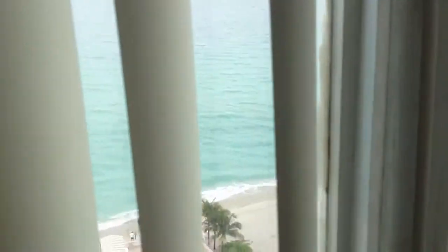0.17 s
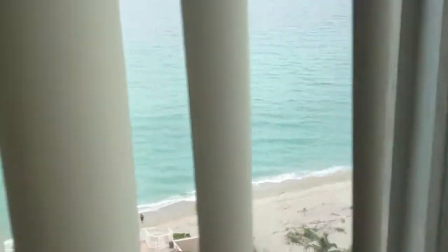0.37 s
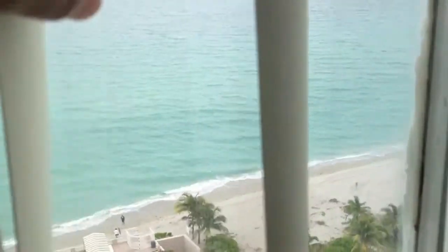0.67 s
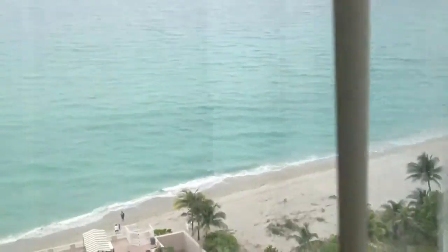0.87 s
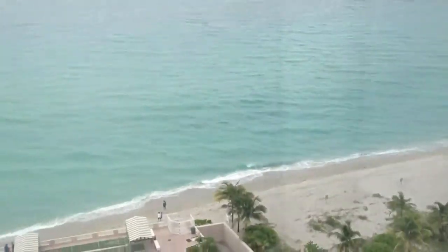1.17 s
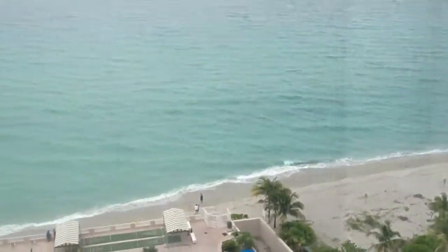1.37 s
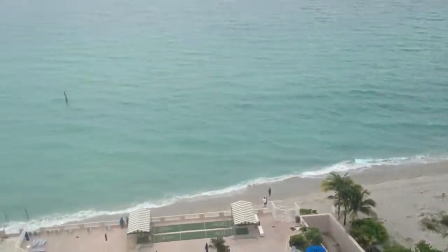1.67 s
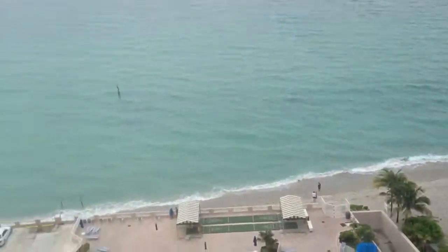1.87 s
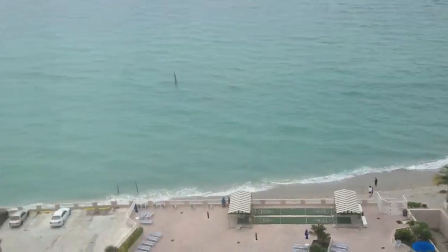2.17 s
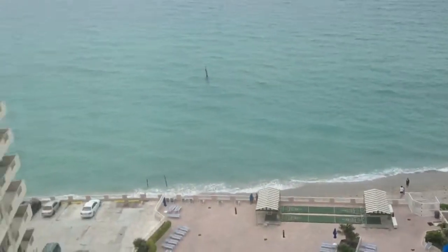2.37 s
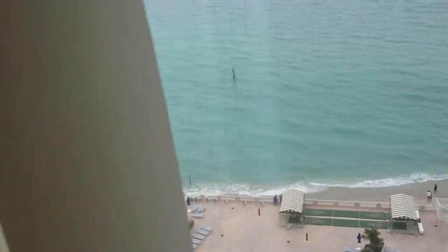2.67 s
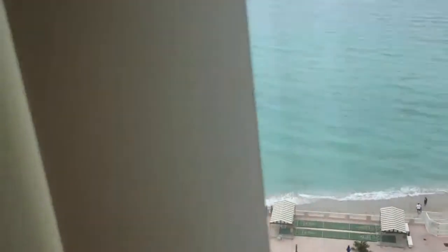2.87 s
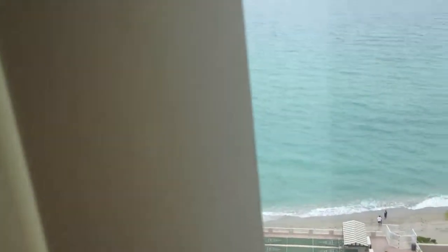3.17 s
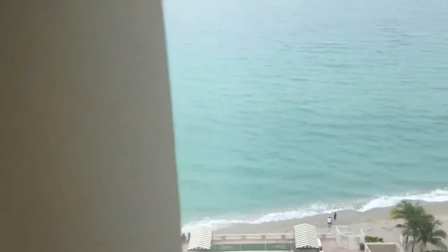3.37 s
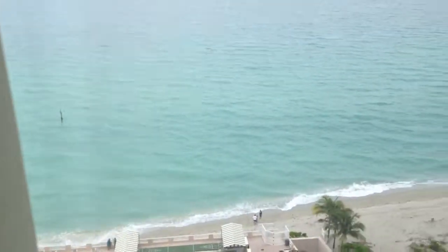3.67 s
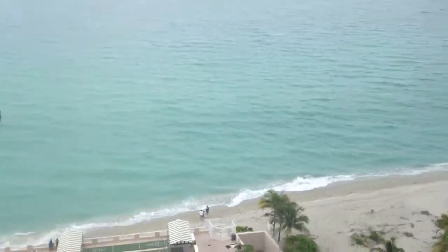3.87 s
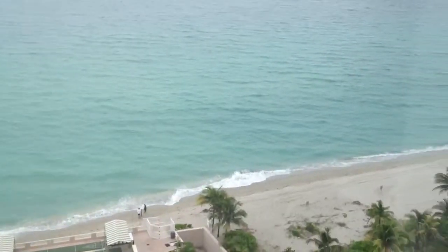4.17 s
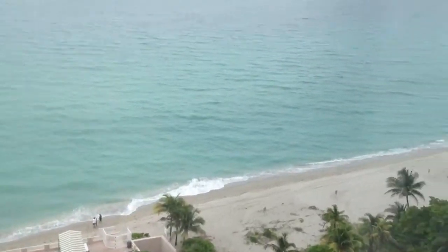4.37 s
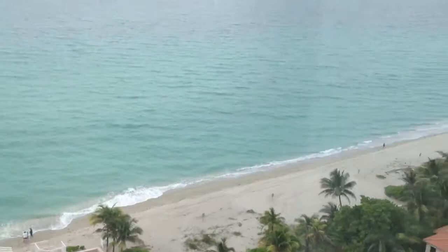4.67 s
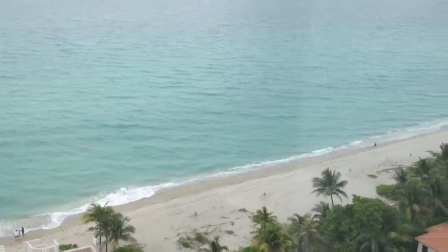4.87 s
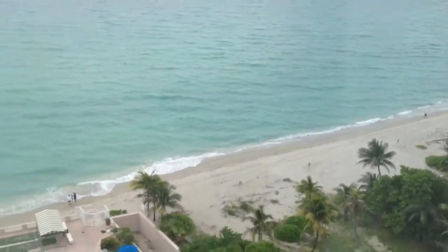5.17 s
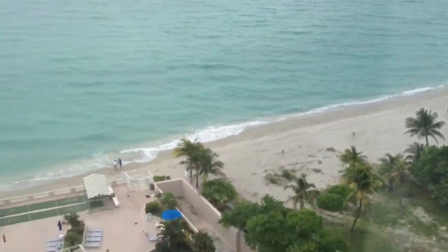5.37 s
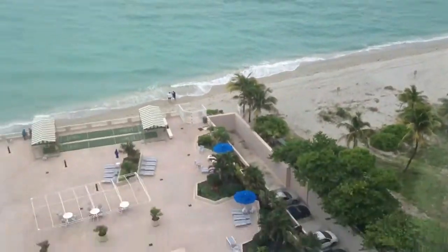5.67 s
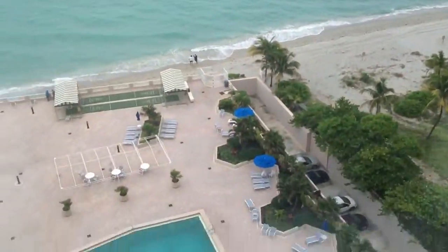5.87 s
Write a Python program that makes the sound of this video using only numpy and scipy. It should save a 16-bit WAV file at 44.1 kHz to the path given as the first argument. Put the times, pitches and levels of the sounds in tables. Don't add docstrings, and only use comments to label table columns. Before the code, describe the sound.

Plastic vertical blind slats tick, scrape and slap as they are pushed aside, with two hollow knocks on the window frame and a low ventilation hum.

```python
import sys
import numpy as np
from scipy import signal
from scipy.fft import rfft, irfft
from scipy.io import wavfile

SR = 44100
rng = np.random.default_rng(int(sys.argv[2]) if len(sys.argv) > 2 else 0)


def makeup_ratio(level_db):
    decades = np.asarray(level_db, float) / 20
    return 10 ** decades


def bounce(signal):
    frames = np.transpose(np.atleast_2d(signal))
    limited = np.clip(frames, -1, 1)
    pcm = np.round(limited * 32767).astype(np.int16)
    wavfile.write(sys.argv[1], SR, pcm)


N = 264644


def rms_one(x):
    return x / np.sqrt(np.mean(x ** 2) + 1e-20)


def at_hz(points, hz):
    points = np.array(points)
    return np.interp(np.log(hz + 1), np.log(points[:, 0]), points[:, 1])


def colour(x, gain_at):
    hz = np.fft.rfftfreq(len(x), 1 / SR)
    return irfft(rfft(x) * gain_at(hz), len(x))


def strip(x, low_hz, high_hz):
    return colour(x, lambda hz: 1 / (1 + (hz / high_hz) ** 12) - 1 / (1 + (hz / low_hz) ** 12))


def drift(rate):
    steps = rng.standard_normal(int(N / SR * 200) + 2)
    return np.interp(np.arange(N) / SR * min(rate, 199), np.arange(len(steps)), steps)


def add(out, x, s):
    at = round(s * SR)
    out[at:at + len(x)] += x[:N - at]


def slat_gain(hz):
    # (frequency [Hz], width [Hz], level [dB])
    resonances = [(685, 34, 1), (1820, 350, 2.5), (2700, 73, -1), (3200, 58, -23), (7200, 1940, 2.5)]
    peaks = sum(makeup_ratio(2 * db) / (1 + (2 * (hz - f) / w) ** 2) for f, w, db in resonances)
    return np.sqrt(1 + peaks)


def air():
    # (frequency [Hz], spectral density [dB per Hz])
    flow_spectrum = [(24, -43), (40, -27), (80, -24), (105, -10.5), (135, -3), (200, -5.5), (270, -8),
                     (400, -14.5), (700, -16), (1300, -18.5), (1700, -25.5), (3400, -30.5), (7500, -34),
                     (9800, -43), (14500, -35.5)]
    hum_hz, hum_db = 121.2, -63
    rumble = rms_one(colour(rng.standard_normal(N), lambda hz: makeup_ratio(at_hz(flow_spectrum, hz))))
    phase = 2 * np.pi * hum_hz * np.arange(N) / SR + 1.9 * drift(9.7)
    hum = np.sin(phase) * makeup_ratio(hum_db + 3.0 + 0.38 * drift(5.6))
    return makeup_ratio(-57 + 0.18 * drift(1.92)) * rumble + hum


def singing(rub, strength_db, swing_db):
    out = rub.copy()
    for hz in np.linspace(24, 94, 44) ** 2 * makeup_ratio(.15 * rng.standard_normal(44)):
        r = np.exp(-np.pi * (45 + .02 * hz) / SR)
        poles = [1, -2 * r * np.cos(2 * np.pi * hz / SR), r * r]
        mode = signal.lfilter([(1 - r * r) / 2, 0, (r * r - 1) / 2], poles, rub)
        out += mode * makeup_ratio(strength_db + swing_db * np.minimum(drift(18), 1.3))
    return out


def pressure(part_db, share, free_db):
    # (time [s], hiss level [dB], flatness of contact [dB])
    sway = [(0, -76, 8.5), (.75, -70, 5.5), (.97, -64.5, 2.5), (1.24, -57.5, -3), (1.3, -57.5, 5),
            (1.41, -53, -10), (1.629, -59, -11), (2.1, -67, 8), (2.3, -61.5, -4), (2.52, -68.5, 0),
            (2.9, -65, -10), (3.25, -62.5, 1.5), (3.72, -63, 12.5), (3.93, -57, 9), (4.1, -61.5, 3.5),
            (4.55, -74, 9.5), (5.7, -81, 10), (6, -67.5, 10.5)]
    # (start [s], length [s], hiss at start [dB], hiss at end [dB], flatness of contact [dB])
    parting = [(0.371, 0.071, -61, -79, 5.5), (.562, 0.04, -64, -60, -3), (0.876, 0.039, -55, -54, -3),
               (1.038, 0.15, -59, -51.5, -30), (1.429, 0.026, -67, -66, 11), (1.525, 0.074, -50, -57, -6.5),
               (1.738, 0.31, -58, -78, -2), (2.035, 0.039, -62, -61, -2), (2.122, 0.061, -61.5, -47, -19),
               (2.186, 0.1, -49, -43.5, -13.5), (2.326, 0.064, -70, -57, -10),
               (2.4285, 0.051, -51.5, -55.5, -7)]
    # (start [s], length [s], hiss at start [dB], hiss at end [dB], flatness of contact [dB])
    swinging = [(2.564, .008, -57, -57, -15), (2.596, .04, -56, -62, -15), (2.648, .004, -48, -52, -15),
                (2.917, 0.13, -63, -48, -10), (3.012, 0.035, -49, -45, -8.5),
                (3.063, 0.027, -39.5, -43, -14), (3.258, 0.018, -44.5, -41.5, -8.5),
                (3.28, .03, -55, -58, -4), (3.316, 0.034, -48.5, -43.5, -5), (3.459, 0.018, -63.5, -55, 17),
                (3.473, 0.048, -50.5, -45, 6), (3.596, 0.015, -42, -42, -3),
                (3.661, 0.031, -46.5, -52, 6.5), (3.761, 0.028, -49, -49, 1),
                (3.832, 0.029, -46.5, -53.5, 10.5), (3.873, 0.047, -44, -53, 4),
                (3.94, 0.091, -47, -47.5, 0), (4.033, 0.02, -40, -44.5, -0.5), (4.057, 0.037, -66, -53, -7),
                (4.14, 0.13, -59, -60, -7), (4.336, 0.16, -61, -61.5, -8), (4.865, 0.16, -62, -68.5, 1),
                (5.521, 0.054, -65, -69, -10), (5.79, .03, -68, -68, 2)]
    grip_db_per_s, let_go_db_per_s = 2500, 900

    t = np.arange(0, N / SR + .002, .001)
    s, hiss_db, flat_db = np.transpose(sway)
    power = makeup_ratio(2 * np.interp(t, s, hiss_db + share * flat_db))
    for strokes, extra_db in [(parting, 0), (swinging, free_db)]:
        for start_s, length_s, first_db, last_db, flat_db in strokes:
            end_s = start_s + length_s
            hold_db = np.interp(t, [start_s, end_s], [first_db, last_db]) + share * flat_db + extra_db
            bite_db = grip_db_per_s * np.maximum(start_s - t, 0)
            let_go_db = let_go_db_per_s * np.maximum(t - end_s, 0)
            power = power + makeup_ratio(2 * (hold_db - bite_db - let_go_db))
    return makeup_ratio(part_db) * np.interp(np.arange(N) / SR, t, np.sqrt(power))


def slides(grains_per_s, spread_db, flutter_db, patchy_db):
    # (frequency [Hz], spectral density [dB per Hz])
    rub_spectrum = [(150, 0), (250, -7), (450, -12), (730, -8.5), (950, -11.5), (1800, -3.5), (2400, -1.5),
                    (3400, -2.5), (6000, -10), (8200, -16), (9500, -26), (12000, -25), (15500, -24.5)]
    # (level [dB], share of flatness [1], extra level when slats swing free [dB])
    rub_parts = [
        (-1, 0.13, -1),
        (-3.5, 0.93, -1),
        (-2, 0.46, 0),
        (-6.5, 0.091, -2),
        (-13, 1, 2),
    ]
    part_bands_hz = [(4000, 5500, 7000, 9000), (250, 550, 900, 1300), (1300, 2100, 2900, 4000),
                     (9000, 12000, 16000), (130, 250)]

    sizes = makeup_ratio(spread_db * np.minimum(rng.exponential(1, N), 2.5)) * rng.choice([-1, 1], N)
    slips = rms_one(sizes * (rng.random(N) < grains_per_s / SR))
    friction = slips + 1.03 * rng.standard_normal(N)
    friction = friction * makeup_ratio(flutter_db * np.minimum(drift(90), 1.5))
    rub = colour(friction, lambda hz: makeup_ratio(at_hz(rub_spectrum, hz)) * slat_gain(hz))
    rub = singing(rub, strength_db=-7, swing_db=7)
    out = 0
    for control, bounds in zip(rub_parts, part_bands_hz):
        part = 0
        for low_hz, high_hz in zip(bounds, bounds[1:]):
            patches = makeup_ratio(patchy_db * np.minimum(drift(60), 1.5))
            part = part + strip(rub, low_hz, high_hz) * patches
        out = out + rms_one(part) * pressure(*control)
    return out


def bumps():
    # (time
    # [s], peak level # [dB], frequency [Hz], T60 [s])
    touch_rings = [(0.191, -34.5, 260, 0.033), (.8755, -36, 2700, .03), (.878, -33, 5050, 0.018),
                   (.888, -41, 5150, .022), (1.259, -38.5, 322, 0.037), (.88, -39, 660, 0.037),
                   (1.259, -32.5, 690, 0.019), (1.2582, -39, 1710, 0.1), (1.304, -42, 1760, 0.041),
                   (1.4928, -30.5, 1626, 0.035), (2.803, -41, 1820, 0.07), (3.47, -40, 158, 0.09),
                   (3.51, -37, 4010, 0.055), (3.526, -31, 690, 0.09), (3.598, -35.5, 2204, 0.095),
                   (3.60, -44, 164, 0.14), (3.735, -39.5, 477, 0.16), (3.82, -23.5, 208, 0.026),
                   (3.898, -45, 163.3, 0.52), (4.029, -34.5, 224, 0.037), (4.036, -36, 1860, 0.059),
                   (.99, -47, 229, .08), (5.615, -47, 244, .08), (2.574, -30, 1234, .04),
                   (2.575, -26, 840, .04), (2.587, -24, 1700, .025), (2.587, -25, 3790, .02),
                   (2.597, -30, 1235, .05), (2.667, -38, 2580, .025), (2.756, -29.5, 1030, 0.039),
                   (2.756, -38, 730, .04), (3.33, -46, 1170, 0.059), (3.474, -34, 987, 0.056),
                   (3.515, -42, 186, .1), (3.535, -41, 333, 0.073), (3.555, -41, 170, .1),
                   (3.612, -44, 344, .06), (3.611, -41, 970, 0.055), (3.648, -41, 156, .1),
                   (3.73, -45, 1010, .05), (3.788, -41, 1030, .03), (3.82, -37, 1250, .05),
                   (3.819, -35, 2760, .02), (3.819, -36, 3920, .02),
                   (.761, -40, 7580, 0.023), (.761, -40, 647, 0.044), (1.2585, -19.5, 1820, 0.014),
                    (1.2585, -26.5, 3640, 0.018), (1.2585, -25, 2720, .02), (1.2585, -29.5, 7230, .02),
                    (1.308, -38, 2450, .03), (2.574, -24, 3320, 0.024), (2.576, -37, 6890, .03),
                    (2.577, -38, 4690, 0.035), (2.639, -21, 1720, .025), (2.639, -27, 2130, .025),
                    (2.654, -28, 1710, .03), (2.685, -29, 376, 0.066), (2.756, -21.5, 1356, 0.015),
                    (3.063, -43, 5170, .04), (3.067, -40, 6200, .03), (3.068, -42, 4300, 0.057),
                    (3.094, -36, 5000, 0.028), (3.331, -30.5, 6600, 0.03), (3.331, -24, 4540, 0.018),
                    (3.331, -34, 3810, 0.026), (3.459, -35, 790, 0.043), (3.474, -33, 5000, .025),
                    (3.475, -31.5, 6680, .025), (3.474, -32, 2430, .02), (3.516, -43, 1890, .03),
                    (3.519, -38, 2970, .03), (3.599, -36, 3780, .03), (3.60, -40, 3340, .03),
                    (3.77, -40, 1850, 0.033), (3.801, -35, 3530, .025), (3.802, -37, 2660, .025),
                    (3.819, -30, 2080, 0.028), (3.819, -32, 6000, .02), (3.824, -30, 7710, .02),
                    (3.839, -40, 1640, .03), (3.875, -36, 7400, 0.02), (3.884, -32, 2940, .025),
                    (3.90, -30, 690, 0.034), (3.90, -37, 1080, .03), (3.992, -34, 1830, .04),
                    (3.993, -37, 3620, .03), (4.038, -31, 4910, .02), (4.349, -43, 5020, .03),
                    (4.348, -45, 3570, .03)]
    out, t = np.zeros(N), np.arange(SR // 4) / SR
    for s, peak_db, hz, t60 in touch_rings:
        build_up = np.minimum(t * hz / 0.72, 1)
        add(out, makeup_ratio(peak_db - 60 * t / t60) * build_up * np.sin(2 * np.pi * hz * t), s)
    return out


def ticks():
    # (time [s], peak level [dB], strongest ring [Hz], highs [dB])
    face_slaps = [(0.3722, -42, 2880, 8), (0.5656, -58, 1060, 7), (0.6381, -39, 2670, -27),
                  (0.7612, -30, 4300, -8), (0.9558, -30, 5840, -1), (1.4266, -30, 3670, -9),
                  (2.8045, -40, 1760, -33), (3.0623, -33.5, 5200, -19), (3.2627, -44, 1880, -39),
                  (3.331, -21.5, 4730, -2.5), (3.4463, -41.5, 799, 4), (3.5125, -26, 660, -2),
                  (3.5955, -26, 7400, -8), (3.6121, -23.5, 700, -9), (3.7305, -33.5, 900, -24),
                  (3.7685, -30, 1030, -23), (3.8188, -21, 584, -8.5), (3.8255, -22.5, 1280, -8),
                  (3.8846, -25.5, 2970, -9), (3.9009, -22, 1540, -16), (4.0386, -28, 1880, -13),
                  (4.812, -48, 506, -3), (5.9728, -42, 676, -8)]
    # (time [s], peak level [dB], strongest ring [Hz], highs [dB])
    edge_ticks = [(0.8754, -26, 2780, -8), (1.038, -41.5, 3860, -1), (1.235, -27, 4730, 1),
                  (1.258, -19.5, 1820, -7), (1.3044, -30.5, 1860, -14), (1.3453, -34, 7550, 1),
                  (1.3504, -34.5, 7340, -15), (1.387, -40, 6930, 2), (1.506, -28.5, 1820, -6),
                  (1.5277, -46, 6900, -15), (1.7904, -38.5, 1900, -4), (2.3054, -39.5, 895, -7),
                  (2.7565, -28.5, 1310, -24.5), (3.0934, -35, 4840, 1), (3.4733, -24, 980, -12),
                  (3.8002, -30, 4600, -16), (3.994, -31.5, 2460, -47), (4.0336, -18.5, 2610, -14.5),
                  (4.3495, -38, 4760, -12), (4.4513, -45, 2560, -5), (4.8806, -45, 3380, -12),
                  (5.0235, -48.5, 692, -14)]
    # (time [s], peak level [dB], strongest ring [Hz], highs [dB])
    dry_clicks = [(1.1092, -32, 4700, -1), (1.1493, -38, 7040, -1), (1.4925, -22, 1600, -18),
                  (1.5214, -25, 5140, 0), (1.7389, -30, 3760, -11), (2.4274, -45, 5990, 2),
                  (3.4985, -28, 5300, -4), (3.6456, -33, 743, -18), (4.086, -36, 7500, 7),
                  (4.1362, -35, 4640, -16), (4.2497, -38, 1730, -5), (4.7207, -39.5, 2580, -7),
                  (4.94, -57, 6000, 5), (5.222, -56, 8000, 8), (5.275, -61, 8000, 14)]
    # touches, level of the lows [dB], T60 [s]
    kinds = [(face_slaps, -7.5, 0.046), (edge_ticks, -17, 0.047), (dry_clicks, -18, 0.02)]
    dull_rings_longer = 0.25

    out, t = np.zeros(N), np.arange(4096) / SR
    rise = np.minimum(t / .00015, 1)
    crack = makeup_ratio(-4.5 - 60 * t / 0.015)
    touches = sorted((*row, low_db, t60) for rows, low_db, t60 in kinds for row in rows)
    draws = rng.standard_normal((len(touches), len(t)))
    for (s, peak_db, ring_hz, high_db, low_db, t60), noise in zip(touches, draws):
        tilt = [(150, low_db + 3.5), (600, low_db + 11.0), (1200, low_db + 7.5), (2200, 0.0042),
                (8000, high_db), (9800, high_db - 3.0), (16000, high_db - 13.0)]

        def sheet_gain(hz):
            hump = 1 + makeup_ratio(8.5) / (1 + (9 * (hz / ring_hz - 1)) ** 2)
            return makeup_ratio(at_hz(tilt, hz)) * slat_gain(hz) * hump

        sheet = rms_one(colour(noise, sheet_gain))
        fall = makeup_ratio(-60 * t / max(t60 * makeup_ratio(-dull_rings_longer * high_db), .004))
        hard = makeup_ratio(0.089 * high_db + 1.5)
        snap = np.sin(2 * np.pi * 4000 * hard * t) * np.exp(-(t * hard / 0.0003) ** 2)
        snap = makeup_ratio(14.5 + 0.14 * high_db) * snap
        splinter = np.diff(noise[::-1], 2, prepend=[0, 0]) / 2
        splinter = makeup_ratio(8 + 0.87 * high_db - 60 * t / .004) * splinter
        touch = sheet * (makeup_ratio(2.5) * fall + crack) + snap + splinter
        add(out, makeup_ratio(peak_db - 13.5) * rise * touch, s)
    return out


def nicks():
    # (time [s], peak level [dB], frequency [Hz])
    hard_points = [(1.1099, -33, 4500), (1.1503, -35, 7000), (1.2353, -26, 5000), (1.351, -26.5, 5900),
                   (1.3824, -42, 6500), (1.3934, -36, 7000), (1.4232, -46, 5900), (1.4429, -39, 2800),
                   (1.7873, -42, 4100), (1.8515, -31.5, 3800), (2.4278, -39, 5900), (2.5739, -14, 3000),
                   (3.0626, -27, 3400), (3.4544, -40, 6900), (3.474, -25, 2800), (3.5949, -30, 3300),
                   (3.6459, -25, 3800), (3.7832, -35, 1500), (3.8253, -24, 6000), (4.0391, -19, 3800),
                   (4.1192, -43, 1790), (4.1364, -30, 3600), (4.1439, -39, 5000), (4.147, -42, 4100),
                   (4.1904, -39, 2800), (4.2335, -41, 2400), (4.2503, -42, 4100), (4.2603, -38, 1800),
                   (4.333, -44, 2400), (4.453, -42, 4500), (4.472, -48, 5000), (4.4898, -39, 4800),
                   (4.7234, -37, 3600), (4.882, -47, 3100), (4.518, -42, 4000), (4.94, -48, 6000),
                   (2.7982, -43, 6000), (5.0245, -49, 3600), (4.0862, -34, 3000)]
    width_cycles = 0.32
    out, t = np.zeros(N), np.arange(-64, 64) / SR
    for s, peak_db, hz in hard_points:
        swing = np.cos(2 * np.pi * hz * t) * np.exp(-(t * hz / width_cycles) ** 2)
        add(out, -makeup_ratio(peak_db) * swing, s + t[0])
    return out


def squeaks():
    # (start [s], length [s], frequency [Hz], level [dB])
    drags = [(1.16, 0.035, 7000, -59), (1.165, 0.04, 4900, -60), (2.125, 0.15, 2990, -56.5),
             (2.179, 0.11, 2590, -53.5), (2.258, 0.022, 1010, -53), (3.006, 0.052, 3140, -52.5),
             (3.458, 0.023, 1260, -44), (3.55, 0.036, 210, -48), (3.654, 0.063, 720, -61),
             (3.936, 0.043, 1410, -51), (3.927, 0.13, 750, -52.5), (3.955, 0.063, 2460, -46.5),
             (4.255, .04, 1790, -63), (4.319, 0.033, 2520, -59), (4.385, 0.054, 2510, -61),
             (4.338, 0.025, 5000, -64), (2.224, 0.042, 6170, -46), (2.25, .04, 5170, -46),
             (2.262, 0.029, 7500, -47.5), (2.172, 0.045, 7650, -50.5), (2.455, 0.022, 8000, -56),
             (2.988, 0.058, 5000, -54.5), (3.016, 0.033, 1760, -50), (3.067, 0.027, 2000, -53),
             (3.068, 0.015, 7400, -58), (3.213, 0.027, 1410, -54), (3.257, .02, 1900, -46),
             (3.499, 0.018, 8100, -45), (3.598, 0.012, 7600, -39.5), (3.94, 0.033, 4700, -55),
             (3.991, .015, 4740, -48), (4.012, .015, 3530, -45), (4.157, .04, 2430, -65),
             (4.188, 0.027, 5800, -62), (4.288, 0.014, 4700, -63), (4.388, 0.066, 3620, -65),
             (2.425, .06, 13500, -60), (2.423, .05, 10600, -61), (3.255, .02, 14000, -54),
             (3.255, .02, 9500, -53), (3.06, 0.026, 5170, -53), (3.057, 0.027, 10000, -52),
             (2.26, 0.014, 3470, -46.5), (2.255, .015, 5860, -50), (3.594, .012, 6800, -39),
             (3.962, .015, 1890, -51), (3.665, 0.018, 1150, -58), (3.952, 0.018, 574, -50)]
    width_hz, widening, edge_s = 70, .09, .012
    out, t = np.zeros(N), np.arange(8192) / SR
    for (s, length_s, hz, level_db), noise in zip(drags, rng.standard_normal((len(drags), len(t)))):
        mode = colour(noise, lambda f: 1 / (1 + (2 * (f - hz) / (width_hz + widening * hz)) ** 2))
        held = np.clip(np.minimum(t, length_s + edge_s - t) / edge_s, 0, 1)
        add(out, makeup_ratio(level_db) * held * rms_one(mode), s)
    return out


def knock(contacts, modes, sheet, soft_hz, cycles, rattle_db, rattle_t60):
    out, t = np.zeros(N), np.arange(SR // 2) / SR
    main_hz, main_db, main_t60 = np.transpose(modes)
    crowd_hz = np.geomspace(260, 9000, 70) * makeup_ratio(.15 * rng.standard_normal(70))
    hz = np.r_[main_hz, crowd_hz]
    level_db = np.r_[main_db, at_hz(sheet, crowd_hz)]
    t60 = np.r_[main_t60, np.clip(cycles / crowd_hz ** .6, .01, .3)]
    rings = makeup_ratio(level_db[:, None] - 60 * t / t60[:, None]) * np.sin(2 * np.pi * hz[:, None] * t)

    shape = (len(contacts), len(hz))
    strengths = makeup_ratio(1.14 * rng.standard_normal(shape)) * rng.choice([-1, 1], shape)
    strengths[:, :len(modes)] = np.abs(strengths[:, :len(modes)]) * (-1.) ** np.arange(len(modes))
    buzz = rng.standard_normal((len(contacts), len(t)))
    snap = makeup_ratio(1.0) * np.sin(2 * np.pi * soft_hz / 2 * t) * np.exp(-(t * soft_hz / 2) ** 2)
    softness = signal.butter(2, np.clip(1.11 * soft_hz, 200, 15000), fs=SR)
    for (s, peak_db), strength, noise in zip(contacts, strengths, buzz):
        rattle = rms_one(colour(noise, lambda f: makeup_ratio(at_hz(sheet, f) - 21.0 * (f < 280))))
        body = strength @ rings - snap + makeup_ratio(rattle_db - 60 * t / rattle_t60) * rattle
        add(out, makeup_ratio(peak_db - 9.5) * signal.lfilter(*softness, body), s)
    return out


def edge_knock():
    # (time [s], peak level [dB])
    edge_contacts = [
        (2.5738, -10),
        (2.577, -10),
        (2.582, -14),
        (2.587, -16),
        (2.591, -40),
        (2.596, -45),
        (2.604, -44),
    ]
    # (frequency [Hz], level [dB], T60 [s])
    edge_modes = [(150, -22, 0.58), (334, -26, 0.57), (690, -1, 0.058), (718, 0.5, 0.11), (800, -34, 0.1),
                  (895, -29, 0.052), (1224, -19, 0.13), (1732, 1, 0.047), (2234, 3.5, 0.025),
                  (2780, -15, 0.058), (558, -13, 0.061)]
    # (frequency [Hz], level [dB])
    edge_sheet = [(300, -32.5), (800, -18), (2500, -17), (4000, -25.5), (6000, -31), (9000, -33.5)]
    return knock(edge_contacts, edge_modes, edge_sheet, soft_hz=5900, cycles=4.2,
                 rattle_db=-6.5, rattle_t60=0.14)


def flat_knock():
    # (time [s], peak level [dB])
    flat_contacts = [
        (2.6386, -3),
        (2.648, -20),
        (2.654, -19),
        (2.659, -34),
        (2.686, -45),
    ]
    # (frequency [Hz], level [dB], T60 [s])
    flat_modes = [(154, -21, 0.72), (325, -9.5, 0.075), (368, -14.5, 0.13), (1047, -22, .07),
                  (684, 1, 0.04), (815, -13, 0.1), (943, -11, 0.065), (1175, -11.5, 0.08),
                  (2670, -22, 0.16)]
    # (frequency [Hz], level [dB])
    flat_sheet = [(250, -30.5), (700, -20), (1400, -21), (2800, -22), (5000, -19.5), (9000, -16)]
    return knock(flat_contacts, flat_modes, flat_sheet, soft_hz=2000, cycles=3.8,
                 rattle_db=-5.5, rattle_t60=0.2)


def room(x):
    t60_s = 0.27
    t = np.arange(SR // 2) / SR
    tail = rng.standard_normal(len(t)) * makeup_ratio(-60 * t / t60_s) * (t > .006)
    tail = signal.lfilter(*signal.butter(1, 4000, fs=SR), tail)
    return signal.fftconvolve(x, tail / np.sqrt(np.sum(tail ** 2)))[:N]


def scene():
    blind = slides(grains_per_s=2500, spread_db=3.5, flutter_db=2.5, patchy_db=2.5)
    blind = blind + bumps() + ticks() + nicks() + squeaks()
    blind = blind + edge_knock() + flat_knock()
    blind = signal.sosfilt(signal.butter(4, 115, "high", fs=SR, output="sos"), blind)
    return (blind + makeup_ratio(-18.5) * room(blind) + air())[None]


def roll_off(x):
    return signal.sosfilt(signal.butter(12, 16470, fs=SR, output="sos"), x)


def record(dry):
    top_hz = 15300
    thin = signal.sosfilt(signal.butter(2, 70, "high", fs=SR, output="sos"), dry)
    cut = signal.sosfilt(signal.ellip(10, 1, 60, top_hz, fs=SR, output="sos"), thin)
    return roll_off(cut + makeup_ratio(-52.0) * thin)


dry = scene()
out = record(dry)
bounce(out)
```